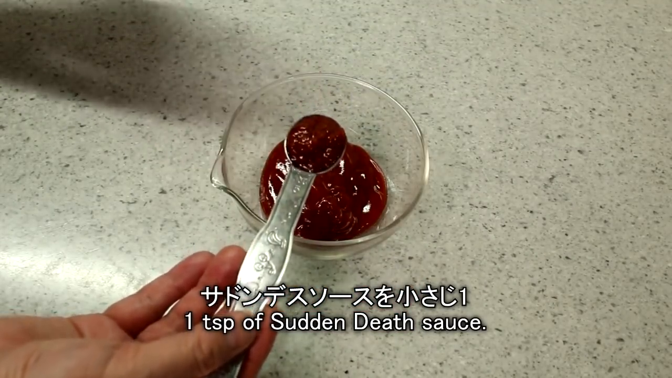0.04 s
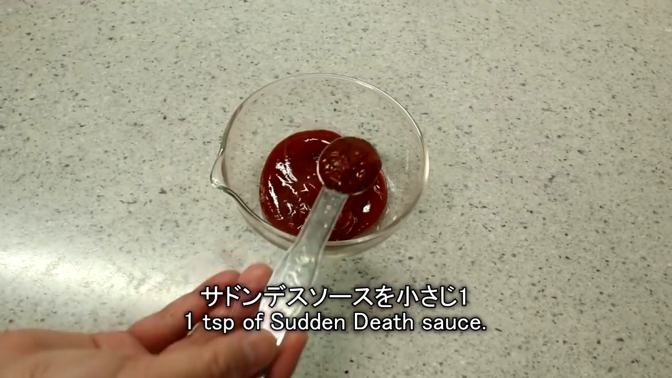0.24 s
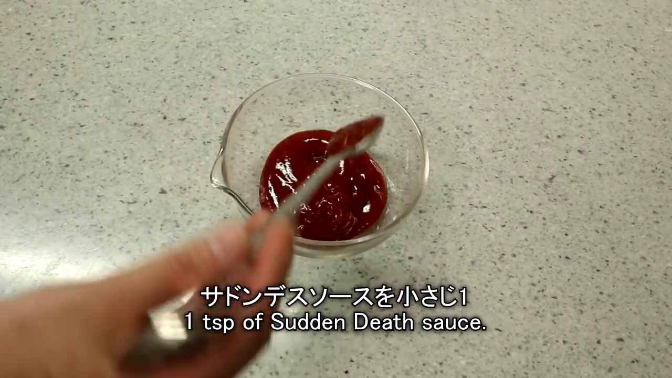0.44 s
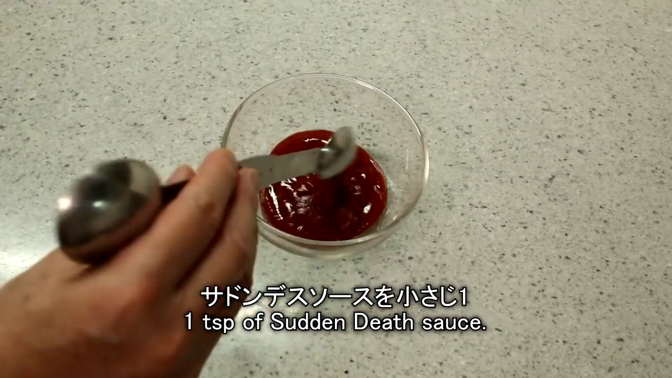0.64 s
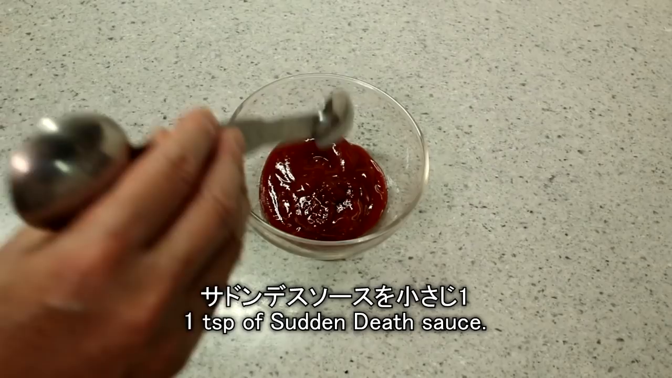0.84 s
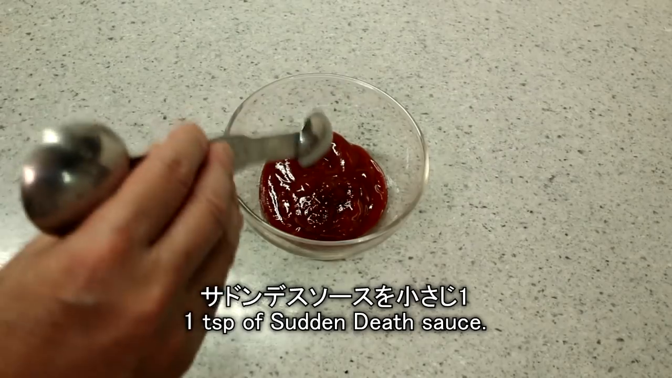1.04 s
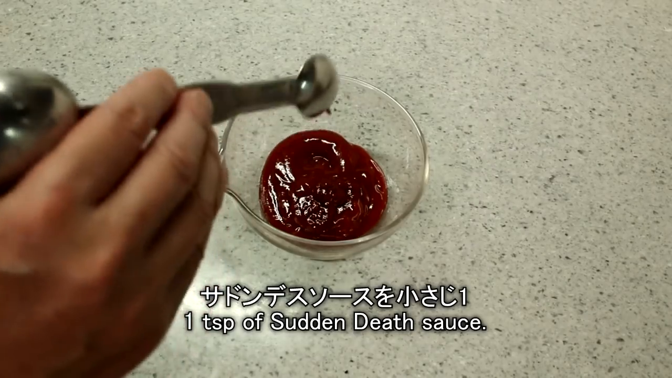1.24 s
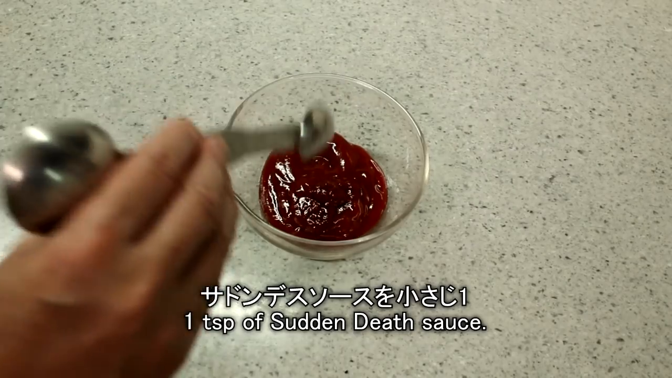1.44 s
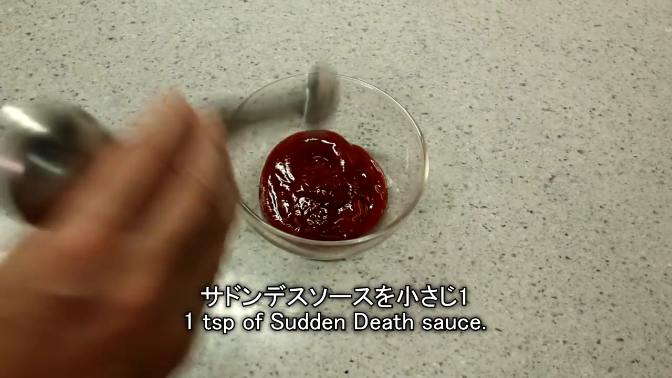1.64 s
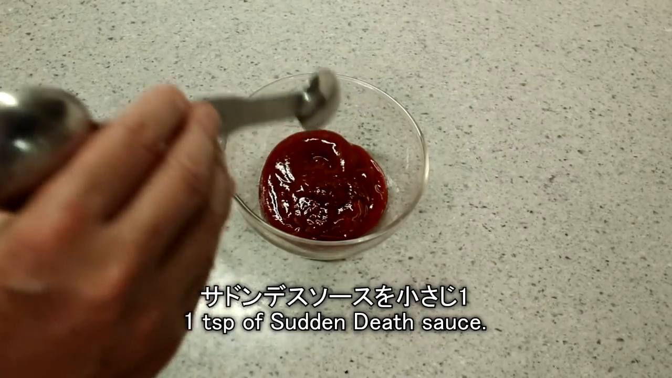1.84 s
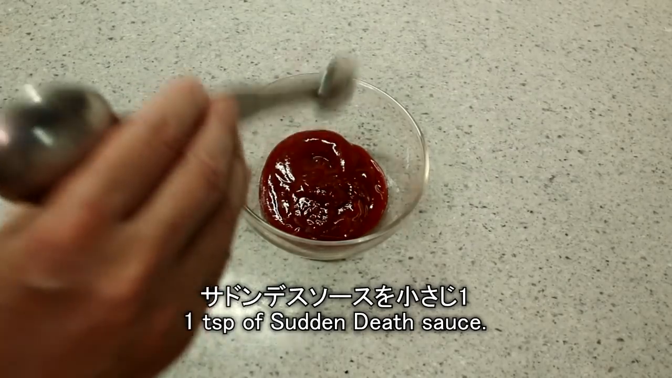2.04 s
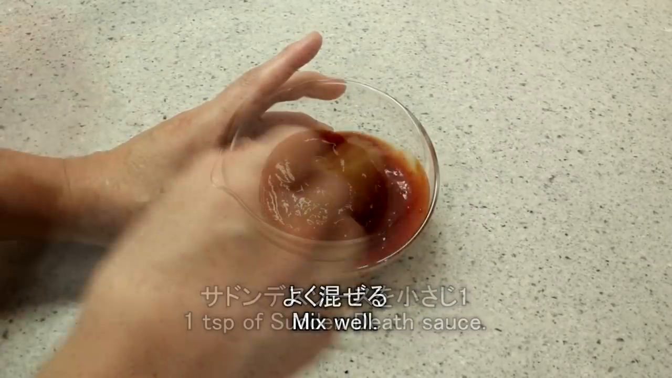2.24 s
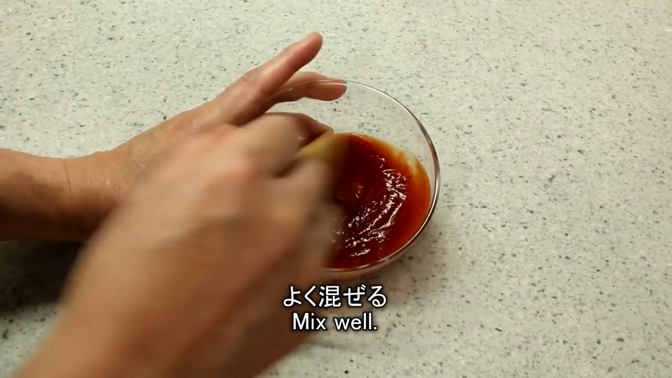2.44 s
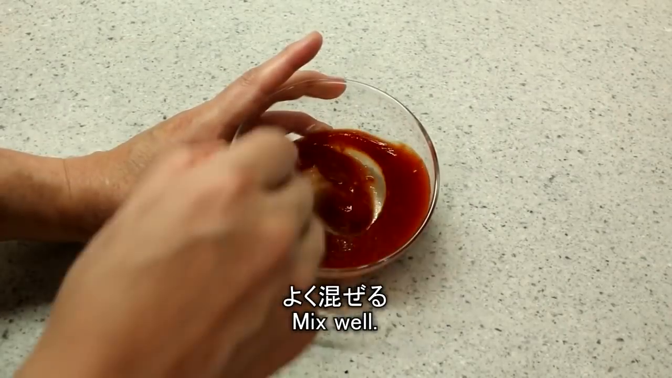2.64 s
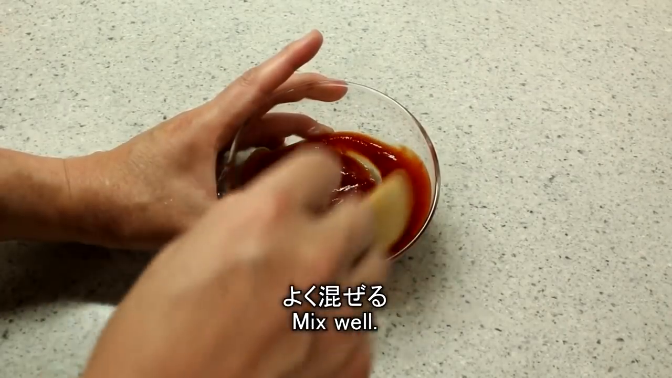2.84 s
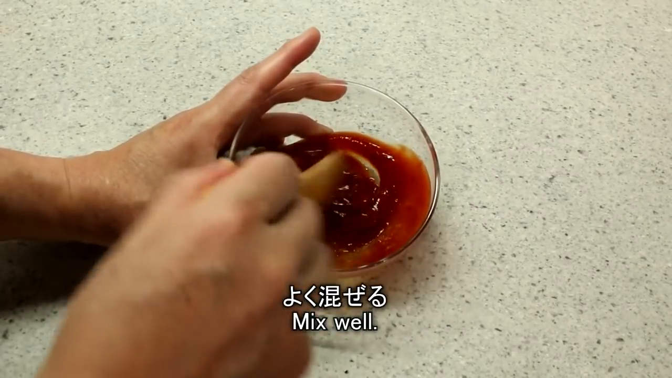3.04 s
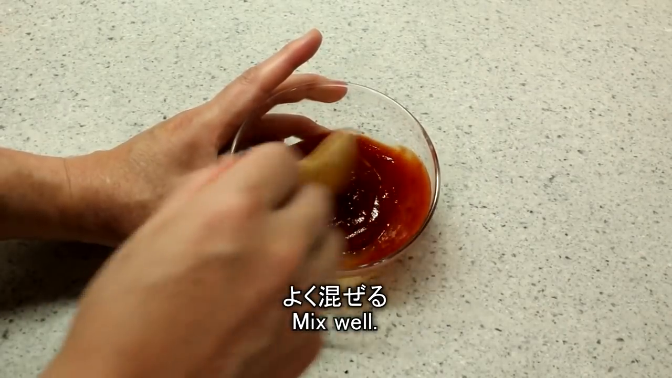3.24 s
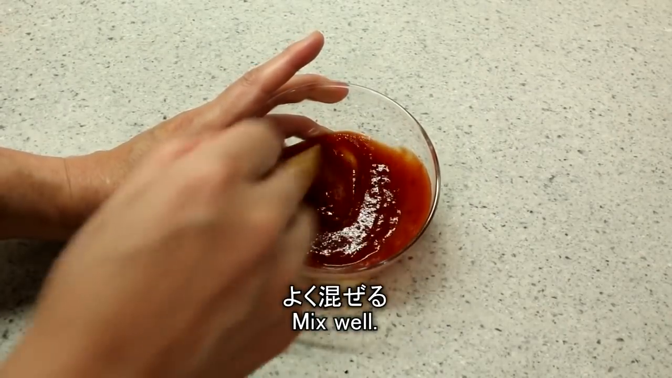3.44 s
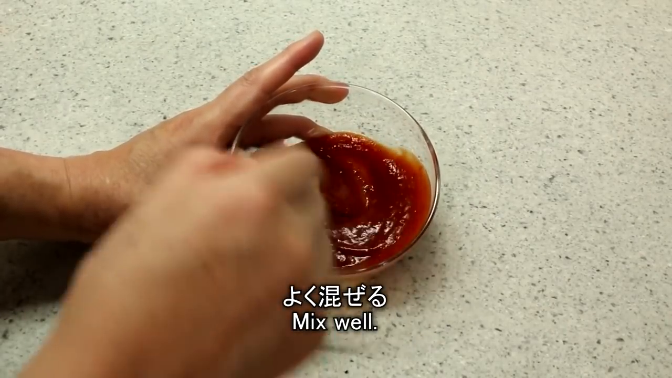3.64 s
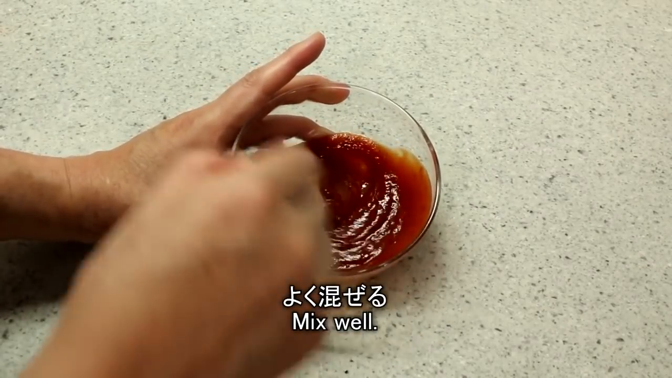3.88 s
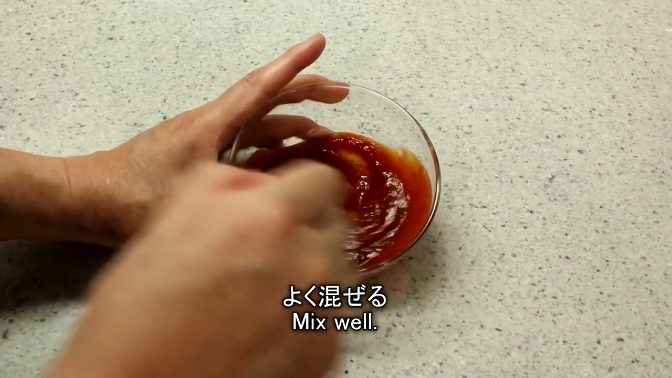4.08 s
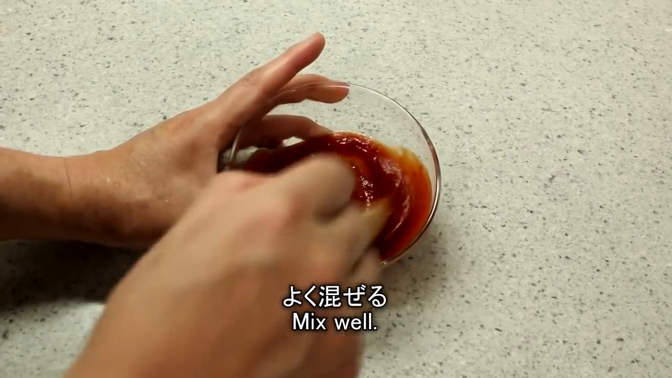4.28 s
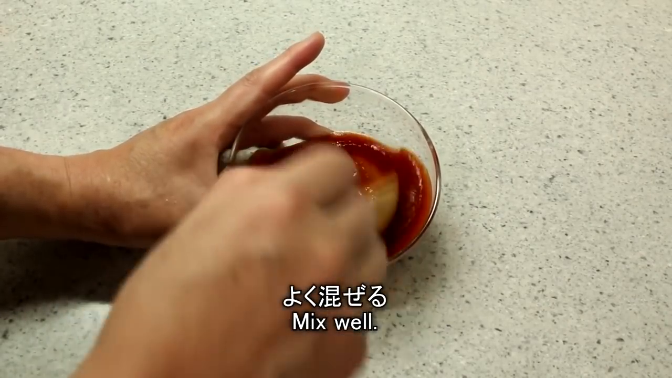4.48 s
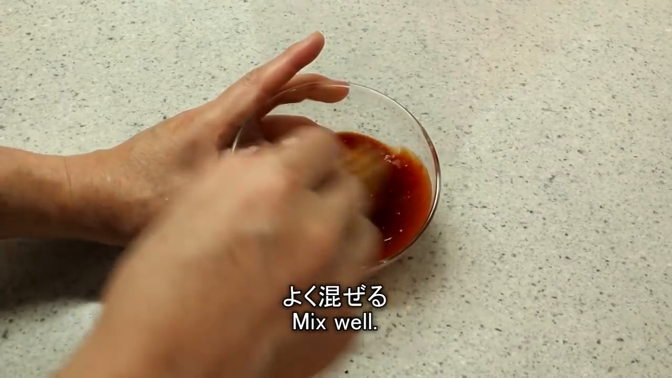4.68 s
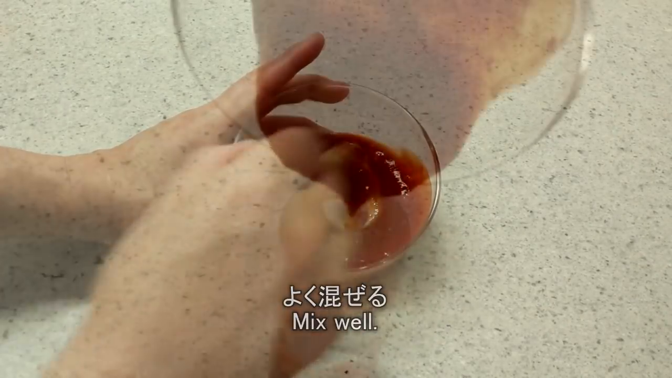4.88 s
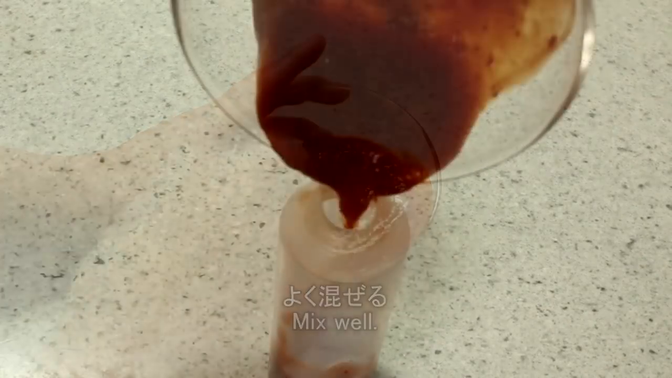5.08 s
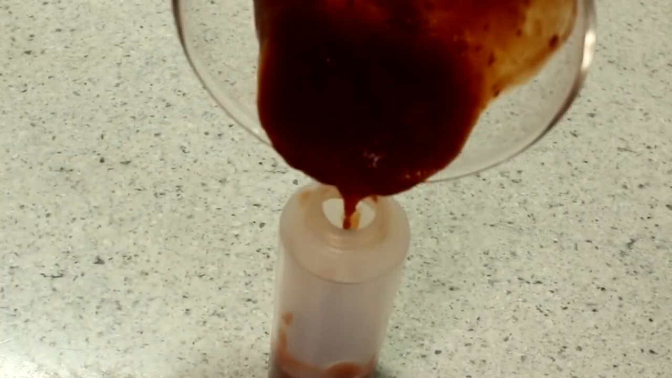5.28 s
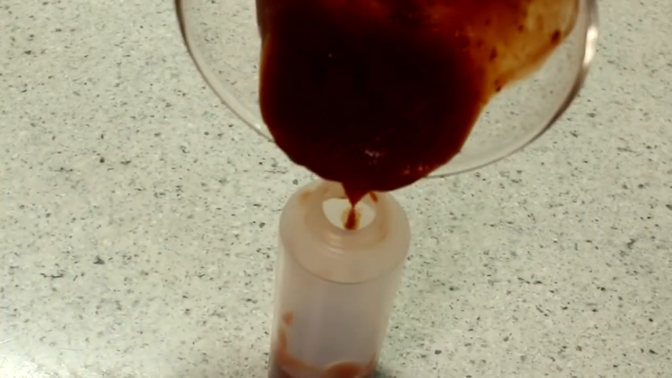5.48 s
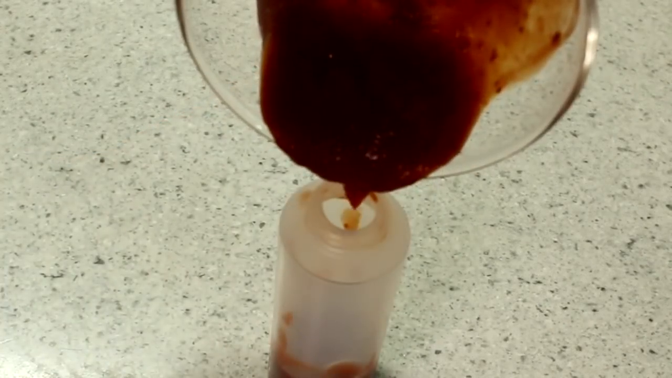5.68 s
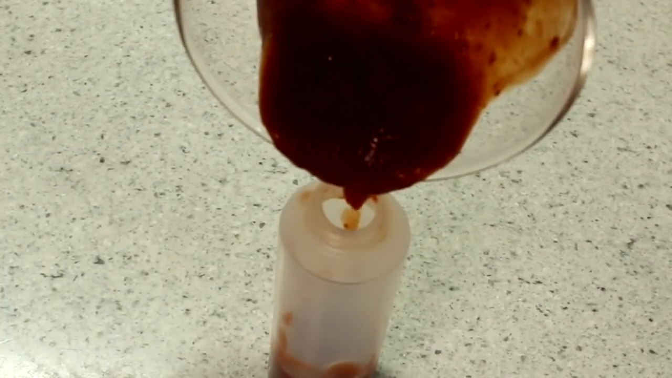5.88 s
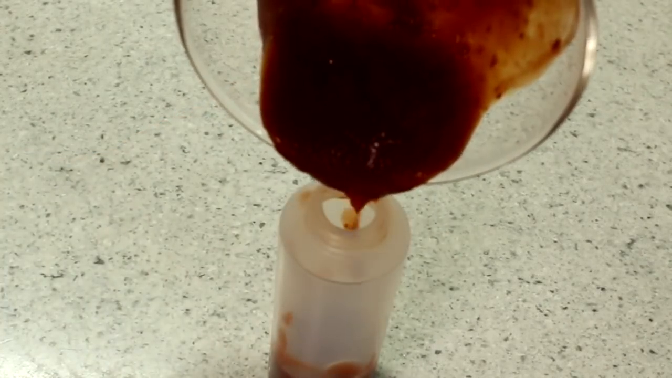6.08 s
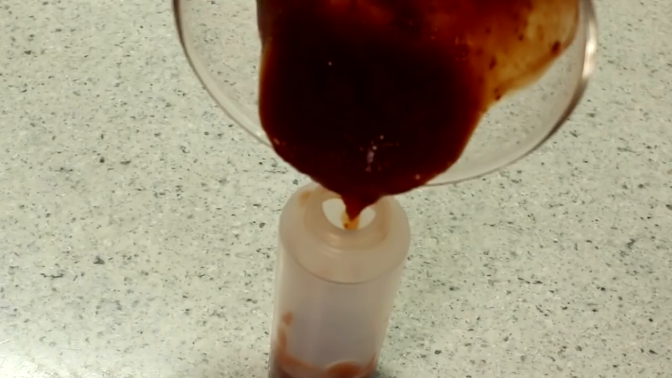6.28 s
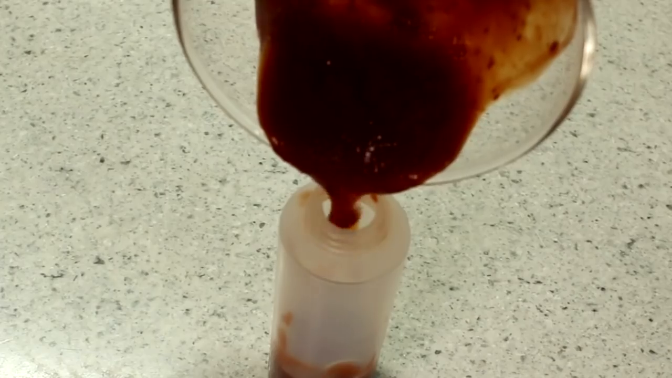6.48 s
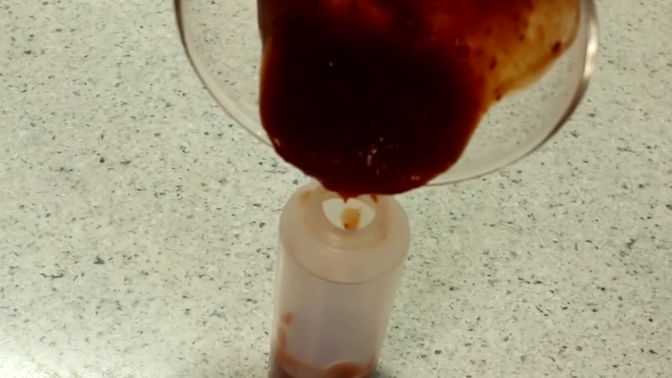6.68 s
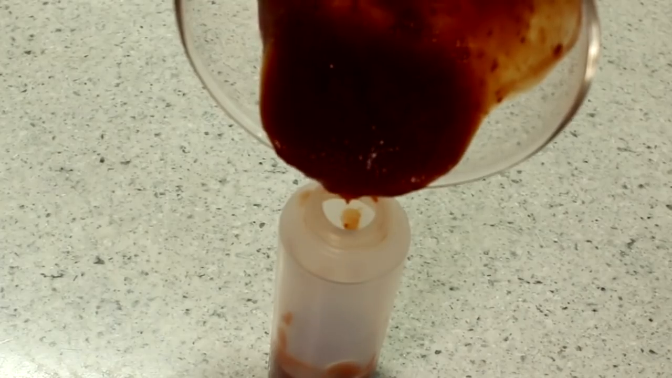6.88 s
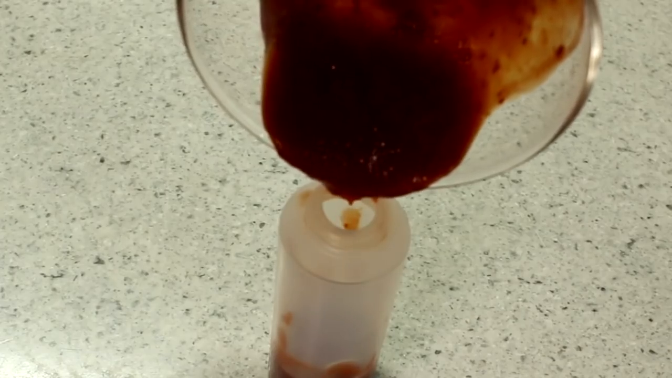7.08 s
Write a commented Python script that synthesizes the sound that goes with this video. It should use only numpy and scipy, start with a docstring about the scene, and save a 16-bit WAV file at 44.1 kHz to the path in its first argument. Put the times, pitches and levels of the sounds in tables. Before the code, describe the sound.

From 0 to about 2.2 seconds there is only a still kitchen: faint appliance hum with a thin electric whine, soft air, microphone hiss and, towards the end, a barely heard churn of sauce. At 2.25 a spoon knocks sharply on a small glass bowl, with another hard hit at 2.55 and little squeaky scrapes between. After a brief slackening, a denser run of duller knocks falls around 2.9 to 3.2, on the bottom of the bowl. From 3.5 to 4.9 come the loudest clinks, about four a second, bright, short and damped, some slightly clipped, with light taps between. Sticky wet drag, small pops and hiss lead into the hard strokes. Weaker taps at 5.2 and 5.3 end the stirring. A short, diffuse room tail fades, then quiet hum and hiss continue to about 7 seconds. Everything at the bowl is close and stereo.

```python
"""First comes a still kitchen: faint hum, soft air, microphone hiss and a barely heard churn of sauce.
Then a spoon stirs thick sauce in a small glass bowl held on the counter, close to a stereo microphone.
Hard knocks, three or four a second, are a noise crack plus damped glass modes; light ones fall between.
Sticky noise grains and pops make the wet drag, which hisses, shakes the bowl and squeaks on the glass.
A diffuse noise tail is the small room; the hardest knocks clip, and quiet room tone ends the take."""
import sys
import numpy as np
from scipy import signal
from scipy.fft import rfft, irfft
from scipy.io import wavfile
from scipy.ndimage import uniform_filter1d

SR = 44100
rng = np.random.default_rng(int(sys.argv[2]) if len(sys.argv) > 2 else 0)


def put_to_file(sound):
    """Save the sound as 16-bit audio at rate SR, in the file named by the first command-line argument."""
    columns = np.atleast_2d(sound).T  # one column per channel
    safe = np.clip(columns, -1, 1)
    whole_steps = np.round(safe * 32767)
    wavfile.write(sys.argv[1], SR, whole_steps.astype(np.int16))


N = 313992  # length in samples
RING_SIZE = 8192  # length of one knock or drag in samples

# colour of the still kitchen's air: pitch_hz, relative level_db per Hz
AIR_COLOUR = [(20, 1), (42, -7.5), (76, -7), (141, -7.5), (291, -7), (400, -10), (580, -10.5), (900, -14.5),
              (1400, -20), (2200, -22), (6500, -22.5), (10000, -23), (13000, -25.5), (15700, -25)]
# appliance hum and thin electric whine: pitch_hz, relative level_db, waver_hz
HUM_LINES = [(72, -75.5, 2.7), (395, -71, 20), (1144, -81.5, 11), (1580, -83.5, 18), (2643, -89, 2),
             (2780, -86, 1.87), (4300, -82.5, 3), (5220, -78.5, 45), (6200, -79, 3.8), (6130, -77.5, 45),
             (7420, -81, 66)]
# colour of the wet spoon drag: pitch_hz, relative level_db per Hz
DRAG_COLOUR = [(200, -4.5), (1000, -4), (2700, -3.5), (3400, 4), (4700, -1.5), (7000, -1), (9000, -0.5),
               (11300, -1), (14000, -3.5), (16000, -13)]
# colour of the soft churning sauce: pitch_hz, relative level_db per Hz
CHURN_COLOUR = [(100, -14), (400, -3), (900, -1.5), (1400, -3), (2500, -16), (6000, -26)]
# modes of rubbed glass: pitch_hz, relative level_db, t60_s
SQUEAK_MODES = [(2360, -5.5, 0.071), (3480, -11, 0.013), (3882, -2, 0.035)]
# pace of the stirring hand: time_s, speed (0 to 1)
HAND_PACE = [(1.9, 0.06), (2.3, 1), (2.75, 1), (2.83, 0.16), (2.92, .47), (3.05, 1), (5.1, 0.63), (5.35, 0)]
# sweeps that graze the glass: middle_s, half_length_s, relative level_db
GRAZING_SWEEPS = [(2.456, .004, -46.5), (2.483, 0.0096, -38), (2.71, 0.018, -40), (2.78, .007, -53.5),
                  (3.125, 0.0063, -41), (3.273, 0.0042, -41), (3.305, .009, -40.5), (4.652, .014, -42),
                  (4.695, .012, -41.5), (5.138, .02, -48)]
# modes of the damped bowl on the counter: pitch_hz, relative energy_db, t60_s, left_minus_right_db
BOWL_MODES = [(492, -7.5, .075, 3.5), (565, -8.5, 0.027, 0), (650, -4.5, 0.029, -0.5),
              (865, -3.5, 0.016, 1), (986, -4.5, 0.016, -8), (1191, 0, 0.018, 5), (1296, -9.5, .028, 6.5),
              (1460, -10, 0.014, 1), (1640, -11, 0.017, 3.5), (1973, -7, 0.016, -8), (2083, -4.5, 0.031, 6),
              (2178, -9, 0.055, 3.5), (2340, -19.5, 0.042, -1.5), (2650, -15.5, 0.028, 3.5),
              (2800, -13, 0.028, -8), (3154, -9.5, 0.0055, -11), (3939, -7.5, .019, -9),
              (5085, -6, 0.0074, 0), (6020, -11.5, 0.015, -7.5), (7360, -18.5, 0.03, 7.5),
              (8710, -19.5, .012, 9.5)]
# colour of the contact crack: pitch_hz, relative level_db per Hz
CRACK_COLOUR = [(60, 6), (200, -3), (600, 1), (1400, 3), (2700, -2), (3500, 3), (5500, 3.5), (7000, -0.5),
                (10000, 0.5), (13000, -12.5), (16000, -17.5)]
# spoon knocks on glass, and soft plops as it lifts off the sauce just after some hard knocks: start_s,
# force_db, brightness_db_per_octave, contact_ms
SPOON_KNOCKS = [(2.2508, -6.5, 2.5, .115), (2.3459, -26.5, 10, 0.21), (2.5553, -3.5, 0.7, .005),
                (2.9351, -22, -6, .095), (2.9719, -9, -3, .15), (3.0138, -11, -0.1, .04),
                (3.0773, -5, -2, .05), (3.1724, -13, -5, .19), (3.3605, -11, -5.5, .04),
                (3.4667, -37, 10, .14), (3.4923, -3, 1, .08), (3.582, -25, -5, .02),
                (3.7364, 4.5, 0.5, .07), (3.9748, 0.5, -1.1, .06), (4.053, -29.5, -7, .03),
                (4.1986, 2, 0.77, .07), (4.2829, -27, 0, .04), (4.4447, 3, 0.4, .08),
                (4.7603, -10, -1.1, .02), (4.7817, -44, 12, .02), (4.9138, 3.5, -1, .05),
                (4.9485, -19, -6, .05), (5.173, -14.5, -4, .03), (5.277, -43.5, 10.5, .14)]
# centres of thud, body, ring, clink and tick: pitch_hz
CONTACT_BANDS_HZ = [450, 1100, 2050, 4200, 9500]
# moment when the spoon works on the bottom of the bowl: from_s, to_s
BOTTOM_SPAN_S = (2.9, 3.1)

# on the bottom the bowl thuds more and rings less; hard knocks elsewhere ring the wall more
BOTTOM_THUD_DB, BOTTOM_RING_DB, WALL_RING_DB = 1.5, -4, 1
# light knocks land lower and thud more: thud at force 0 dB, and its change per dB of force
THUD_DB, THUD_PER_DB = -9.5, -0.37
# below this pitch the thud is weaker by this much
DEEP_DB, DEEP_HZ = -3.5, 220
# before every knock harder than this the spoon rubs up the wall
HARD_KNOCK_DB = -8
RUN_UP_LEAD_S, RUN_UP_HALF_S, RUN_UP_DB = 0.021, 0.02024, -47.5
RECORDER_TOP_HZ = 15650


def undb(db):
    """Decibels to gain."""
    return 10 ** (np.asarray(db) / 20)


def unit(x):
    """Scale to unit energy, averaged over the channels."""
    return x / np.sqrt(np.mean(np.sum(x ** 2, axis=-1)))


def fade(t, t60):
    """Exponential decay by 60 dB in t60 seconds."""
    return np.exp(-np.log(1000) * t / t60)


def on_bins(points, size):
    """Read (Hz, value) points at the bins of a transform, on a log-frequency axis."""
    hz, value = np.transpose(points)
    bin_hz = np.arange(size // 2 + 1) * SR / size
    return np.interp(np.log(bin_hz + 1), np.log(hz), value)


def response(points, size=2048):
    """Causal minimum-phase impulse response with the given (Hz, dB) colour."""
    cepstrum = irfft(np.log(undb(on_bins(points, size))))
    # folding the cepstrum onto positive time puts the energy first
    cepstrum[1:size // 2] *= 2
    cepstrum[size // 2 + 1:] = 0
    return irfft(np.exp(rfft(cepstrum)))


def through(x, h):
    """Filter x with the response h, keeping its length."""
    filtered = signal.fftconvolve(np.atleast_2d(x), np.atleast_2d(h), axes=-1)
    return filtered[:, :np.shape(x)[-1]]


def noise_pair(size, likeness):
    """Left and right white noise with the given correlation."""
    mid, side = rng.standard_normal((2, size))
    c = np.clip(likeness, -1, 1)
    shared = np.sqrt(1 + c) * mid
    opposed = np.sqrt(1 - c) * np.array([side, -side])
    return (shared + opposed) / np.sqrt(2)


def walk(rate):
    """Smooth random wander, with about rate new targets a second and a spread near 1."""
    k = int(SR / rate)
    steps = np.repeat(rng.standard_normal(N // k + 1), k)
    return uniform_filter1d(steps, k)[:N]


def hum_lines():
    """Appliance tones waver in pitch and level as smooth random walks."""
    t = np.arange(N) / SR
    hum = np.zeros((2, N))
    for hz, level_db, waver_hz in HUM_LINES:
        phase = 2 * np.pi * (hz * t + np.cumsum(waver_hz * walk(rate=99)) / SR)
        # low hum arrives nearly alike at both sides, short waves do not
        offset = min(hz / 2500, np.pi / 2)
        level = undb(level_db + 0.96 * walk(rate=8))
        hum += level * np.sqrt(2) * np.sin([phase, phase + offset])
    return hum


def room_tone(air_db, hum_db, rumble_db):
    """Coloured noise is soft air, microphone hiss and a faint swelling rumble, under the hum lines."""
    air = through(noise_pair(N, likeness=.14), unit(response(AIR_COLOUR, size=8192)))
    rumble_colour = [(20, -4.5), (70, -8), (160, -33.0), (600, -74.5)]
    rumble = through(noise_pair(N, likeness=-.3), unit(response(rumble_colour, size=8192)))
    swell = undb(rumble_db + 3.5 * walk(rate=6))
    return undb(air_db) * air + undb(hum_db) * hum_lines() + swell * rumble


def kitchen(x, room_db, low_t60, treble_t60):
    """Cupboards and walls answer with a short, diffuse tail, wider in the treble."""
    t = np.arange(SR // 2) / SR
    low_colour = [(150, 10.5), (600, -1.5), (1100, -5.5), (2200, -3), (4500, -10), (12000, -14.5)]
    low = through(noise_pair(len(t), likeness=0.92), response(low_colour))
    high_colour = [(1000, -22.5), (4500, -7.5), (12000, 0)]
    high = through(noise_pair(len(t), likeness=0), response(high_colour))
    onset = np.clip(t / 0.0059, 0, 1)
    tail = (low * fade(t, low_t60) + high * fade(t, treble_t60)) * onset
    return x + through(x, undb(room_db) * unit(tail))


def weak_bass(x, edge_hz, leak_db):
    """So small a body radiates little bass; some leaks out through the counter."""
    high_pass = signal.butter(2, edge_hz, "high", fs=SR, output="sos")
    return signal.sosfilt(high_pass, x) + undb(leak_db) * x


def bowl_ring(scatter_db, detune, lag_s):
    """Damped modes answer one tap; contact place and shifting sauce change each a little."""
    t = np.arange(RING_SIZE) / SR
    hz, energy_db, t60, pan_db = np.transpose(BOWL_MODES)[:, :, None]
    pitch_chance, level_chance, lag_chance = rng.standard_normal((3, len(hz), 1))
    sides = np.array([1, -1])[:, None, None]
    # each mode radiates from its own part of the wall and reaches one side a little later
    age = np.maximum(t - np.maximum(sides * lag_s * lag_chance, 0), 0)
    # dividing by the root of t60 makes the table's level an energy
    gains = undb(energy_db + scatter_db * level_chance + sides * pan_db / 2) / np.sqrt(t60)
    tones = np.sin(2 * np.pi * hz * (1 + detune * pitch_chance) * age)
    ring = np.sum(gains * tones * fade(age, t60), axis=1)
    return unit(weak_bass(ring, edge_hz=568, leak_db=-30.5))


def squeak_ring(detune):
    """Rubbed glass rings at a slightly different pitch on each stroke."""
    t = np.arange(RING_SIZE) / SR
    shift = 1 + detune * rng.standard_normal()
    ring = np.zeros(RING_SIZE)
    for hz, level_db, t60 in SQUEAK_MODES:
        mode = np.sin(2 * np.pi * hz * shift * t) * fade(t, t60)
        ring += undb(level_db) * unit(mode)
    return ring


def sticky_slips(grain_db, pops_per_s, pop_db):
    """Uneven friction noise, with sparse pops where strands of sauce let go."""
    stick = undb(grain_db * walk(rate=520) + 2.0 * walk(rate=110))
    friction = noise_pair(N, likeness=0.27) * stick / np.sqrt(np.mean(stick ** 2))
    pops = (rng.random(N) < pops_per_s / SR) * noise_pair(N, likeness=.6)
    return friction + undb(pop_db) * pops


def strokes():
    """The spoon presses on the glass in each grazing sweep and in the run-up to each hard knock."""
    run_ups = []
    for start_s, force_db, *_ in SPOON_KNOCKS:
        if force_db > HARD_KNOCK_DB:
            run_ups.append((start_s - RUN_UP_LEAD_S, RUN_UP_HALF_S, RUN_UP_DB))
    return GRAZING_SWEEPS + run_ups


def stirring(hiss_db, rumble_db, squeak_db, between_db, churn_db):
    """Tiny sticky slips swell with each stroke; they hiss, shake the bowl and make the glass squeak."""
    t = np.arange(N) / SR
    slips = sticky_slips(grain_db=3.0, pops_per_s=170, pop_db=16)
    smear = undb(hiss_db) * unit(response(DRAG_COLOUR))
    # between strokes the spoon still drags and churns the sauce, as fast as the hand moves
    sauce = undb(between_db) * smear + undb(churn_db) * unit(response(CHURN_COLOUR))
    out = through(slips * np.interp(t, *np.transpose(HAND_PACE)), sauce)
    for middle_s, half_s, level_db in strokes():
        start = int((middle_s - 3 * half_s) * SR)
        near = slice(start, start + RING_SIZE)
        swell = np.exp(-((t[near] - middle_s) / half_s) ** 2)
        drag = undb(level_db) * slips[:, near] * swell
        shaken_bowl = bowl_ring(scatter_db=6.0, detune=0.013, lag_s=.00008)
        out[:, near] += through(drag, smear)
        out[:, near] += undb(rumble_db) * through(drag[0], shaken_bowl)
        out[:, near] += undb(squeak_db) * through(drag, squeak_ring(detune=0.00799))
    return out


def counter_thump(hz, t60):
    """The worktop gives a brief low bump under the bowl, one decaying sine."""
    t = np.arange(RING_SIZE) / SR
    return unit(np.sin(2 * np.pi * hz * t) * fade(t, t60))


def hands(x, db, t60):
    """Wall, hands and counter scatter each knock into its own random echoes as the hands move."""
    t = np.arange(RING_SIZE) / SR
    unevenness = undb(3.9 * rng.standard_normal(RING_SIZE))
    echoes = noise_pair(RING_SIZE, likeness=0.513) * unevenness * fade(t, t60)
    echoes = echoes * (t > .0025)
    colour = [(200, -4.0), (500, 1.5), (1200, -1), (2200, 1), (5000, -3.0), (12000, -1.5)]
    echoes = through(echoes, response(colour))
    return x + through(x, undb(db) * unit(echoes))


def contact(start_s, force_db, bright_db, contact_ms):
    """A clean, bare strike tilts a blow's colour up; a film of sauce lengthens the push and takes off the top."""
    hz = np.array(CONTACT_BANDS_HZ)
    octaves = np.log2(hz / hz[1])
    thud_db = THUD_DB + THUD_PER_DB * force_db
    db = np.where(octaves < 0, thud_db, bright_db * octaves)
    if BOTTOM_SPAN_S[0] < start_s < BOTTOM_SPAN_S[1]:
        db = db + np.array([BOTTOM_THUD_DB, 0, BOTTOM_RING_DB, 0, 0])
    elif force_db > HARD_KNOCK_DB:
        db = db + np.array([0, 0, WALL_RING_DB, 0, 0])
    # spectrum of a bell-shaped push, in dB
    cushion_db = 20 * np.log10(np.e) * (hz * contact_ms / 1000) ** 2
    return response([(DEEP_HZ, db[0] + DEEP_DB), *zip(hz, db - cushion_db)])


def knocks(ring_db, crack_db, crack_t60, thump_db):
    """Each knock is a short noise crack, the bowl's modes and a thump, coloured by its contact."""
    out = np.zeros((2, N))
    t = np.arange(RING_SIZE) / SR
    crack_colour = response(CRACK_COLOUR)
    thump = counter_thump(hz=143, t60=0.05)
    for start_s, force_db, bright_db, contact_ms in SPOON_KNOCKS:
        burst = noise_pair(RING_SIZE, likeness=0.14) * fade(t, crack_t60)
        crack = unit(through(burst, crack_colour))
        ring = bowl_ring(scatter_db=2.5, detune=0.0056, lag_s=.00006)
        blow = undb(ring_db) * ring + undb(crack_db) * crack
        blow = hands(blow, db=-11.5, t60=0.076) + undb(thump_db) * thump
        coloured = through(blow, contact(start_s, force_db, bright_db, contact_ms))
        start = int(start_s * SR)
        out[:, start:start + RING_SIZE] += undb(force_db) * coloured
    return out


def scene():
    """Knocks and stirring in the kitchen, over its room tone."""
    bowl = knocks(ring_db=14.5, crack_db=10, crack_t60=0.009, thump_db=-12)
    bowl = bowl + stirring(hiss_db=-3.0, rumble_db=-10, squeak_db=-7.5, between_db=-52.5, churn_db=-59)
    room = kitchen(bowl, room_db=-13, low_t60=0.34, treble_t60=0.29)
    return room + room_tone(air_db=-56.0, hum_db=1.5, rumble_db=-76.0)


def record(dry):
    """The recorder clips at full scale, then a steep low-pass cuts the top."""
    clipped = np.clip(dry, -1, 1)
    low_pass = signal.ellip(8, .2, 70, RECORDER_TOP_HZ, fs=SR, output="sos")
    return signal.sosfilt(low_pass, clipped)


dry = scene()
out = record(dry)
put_to_file(out)
```